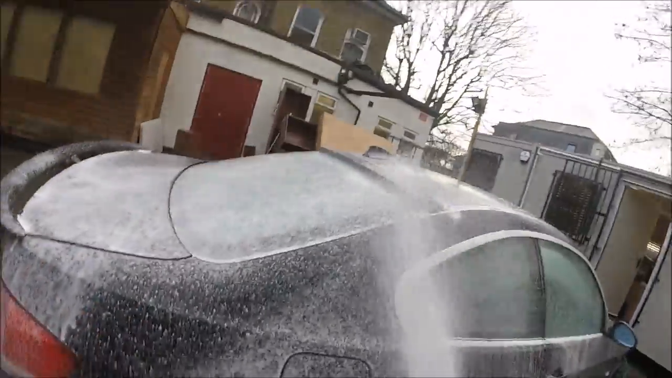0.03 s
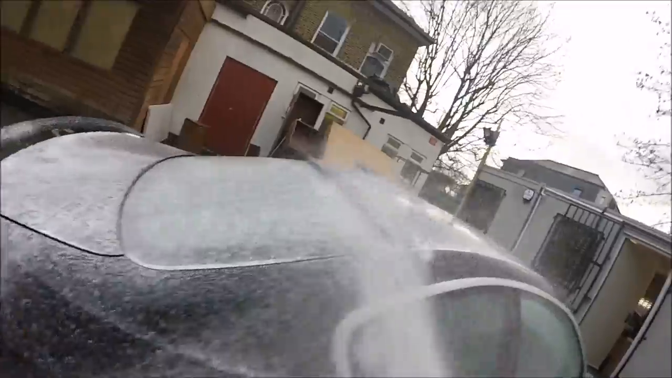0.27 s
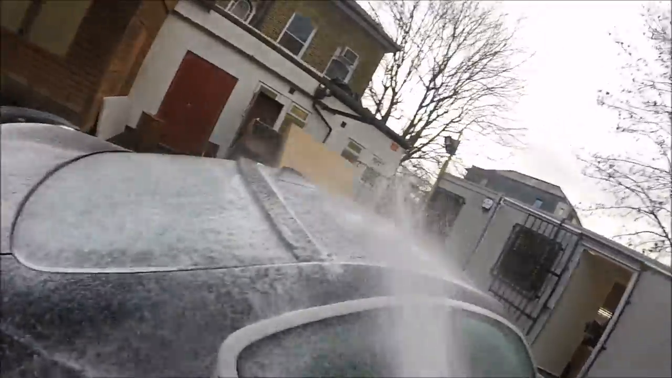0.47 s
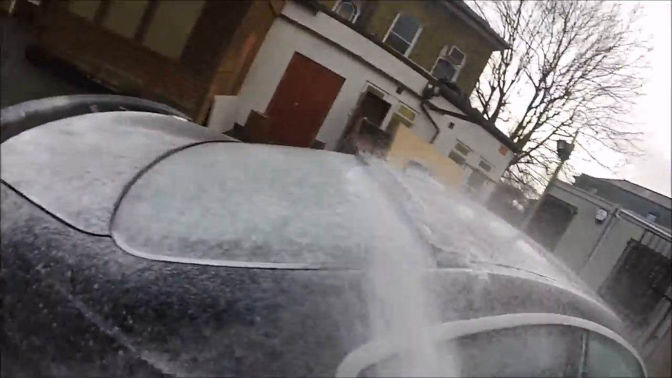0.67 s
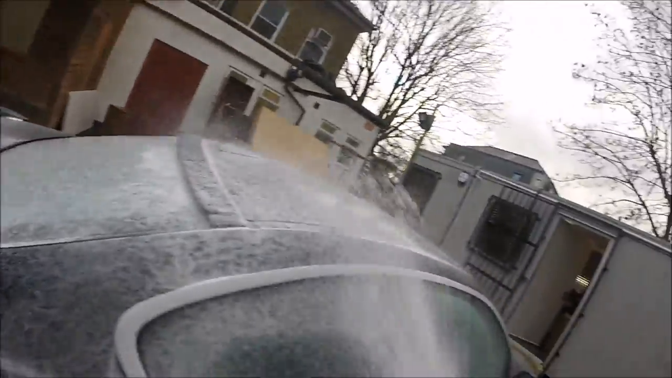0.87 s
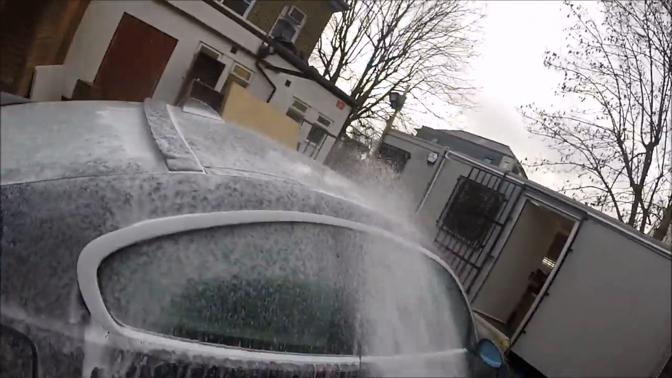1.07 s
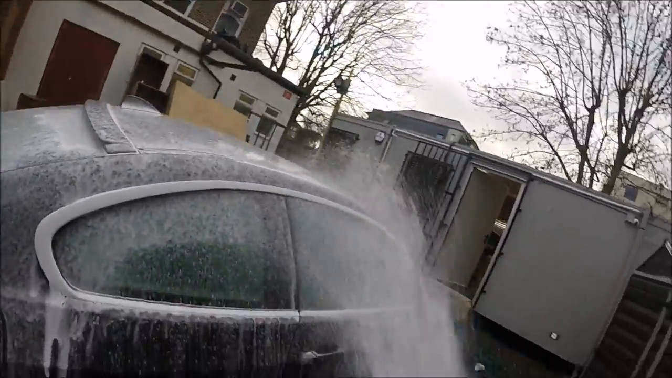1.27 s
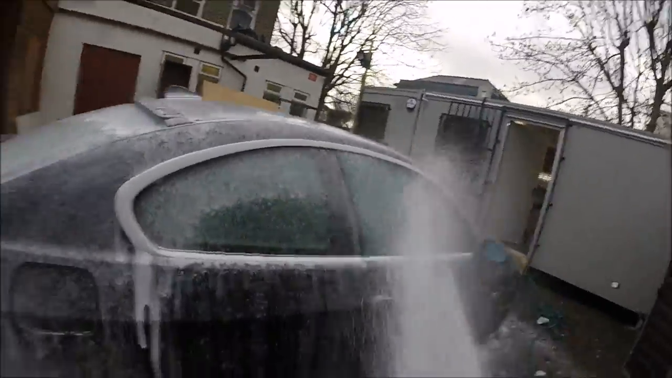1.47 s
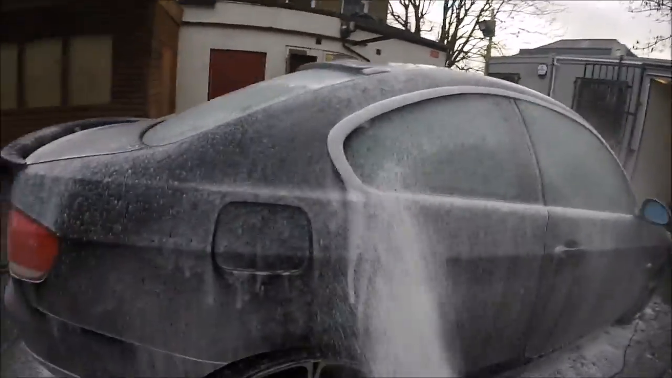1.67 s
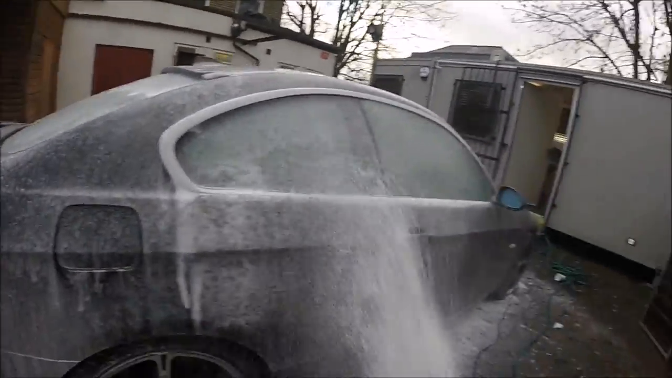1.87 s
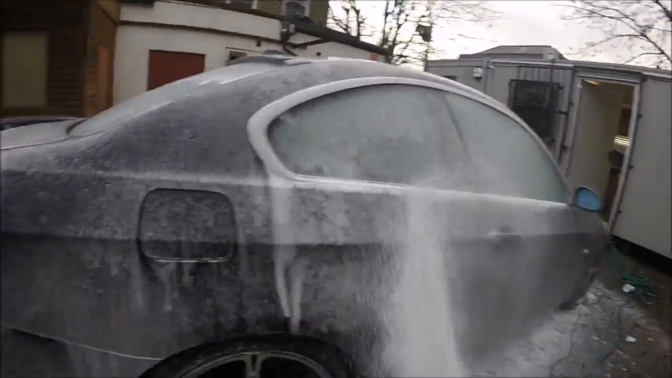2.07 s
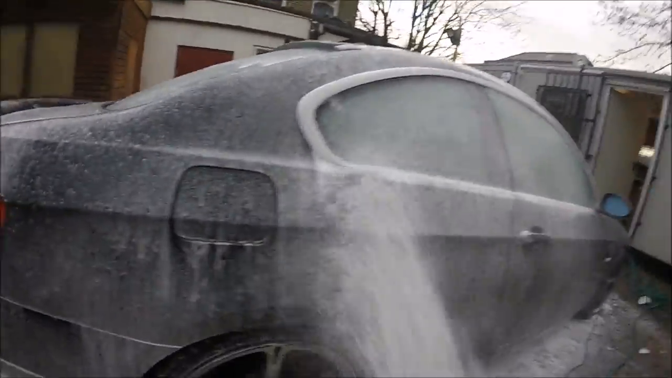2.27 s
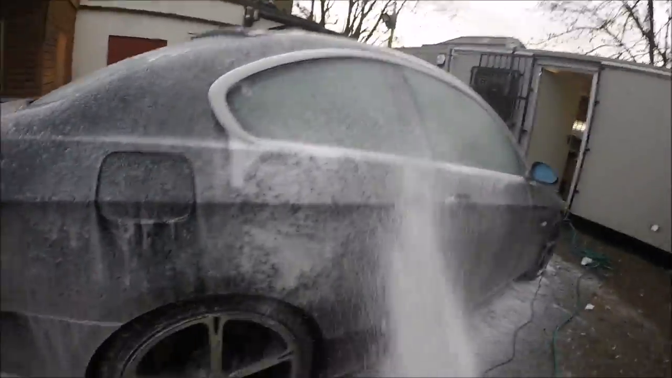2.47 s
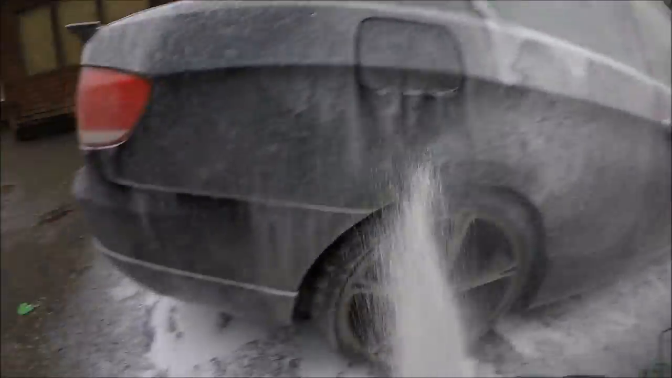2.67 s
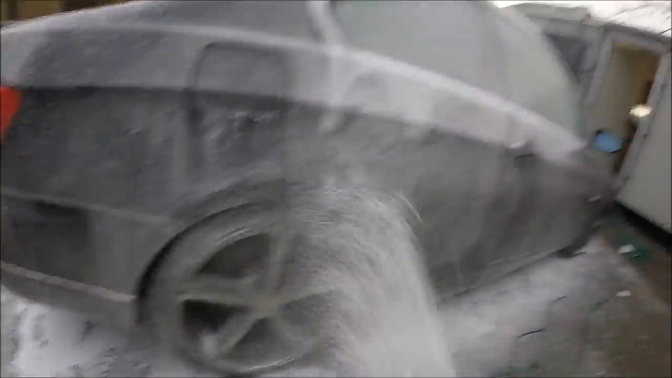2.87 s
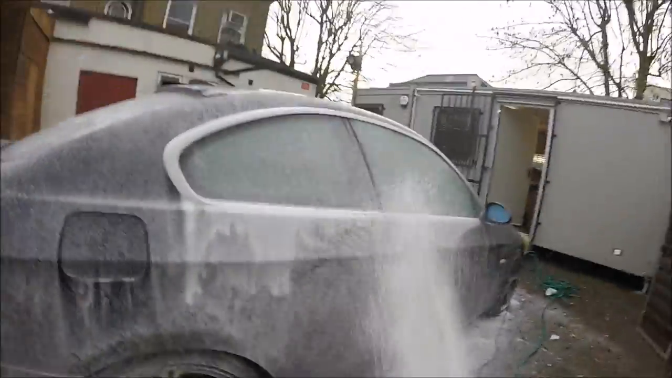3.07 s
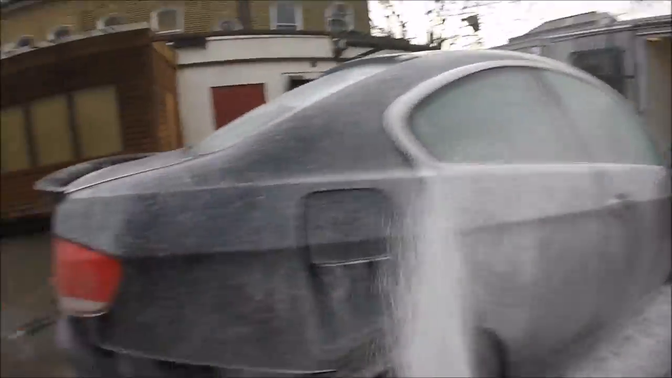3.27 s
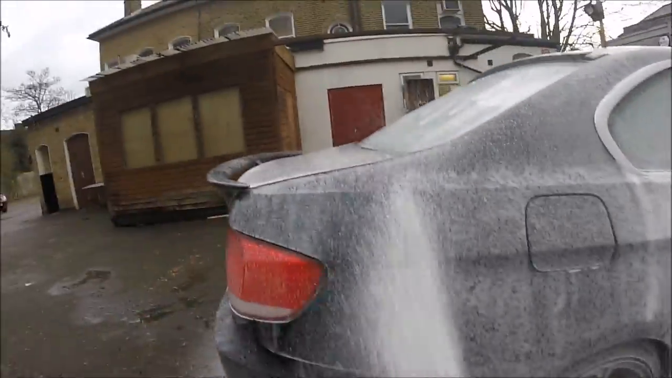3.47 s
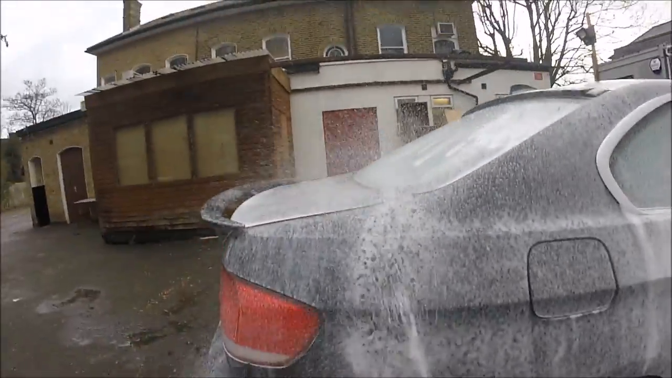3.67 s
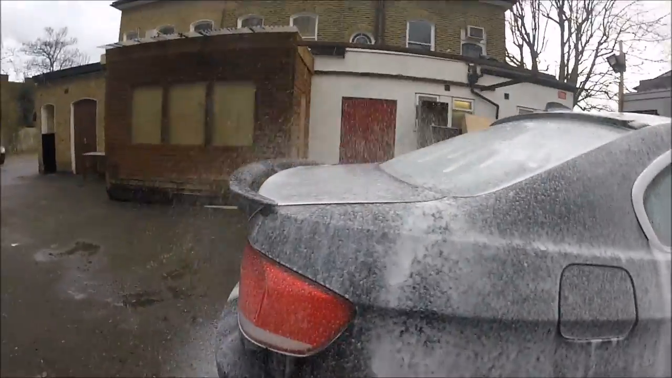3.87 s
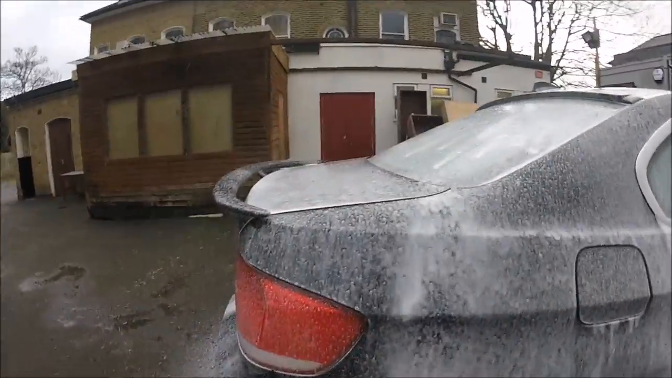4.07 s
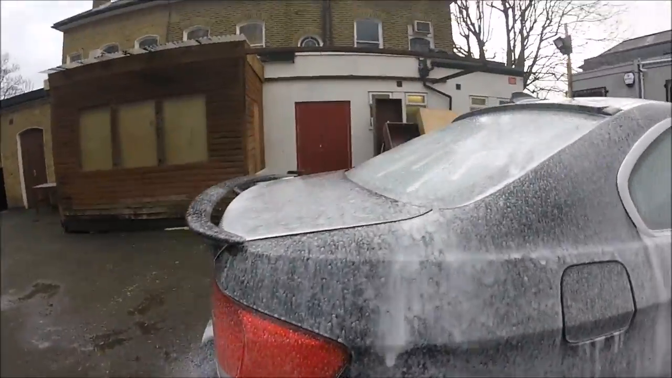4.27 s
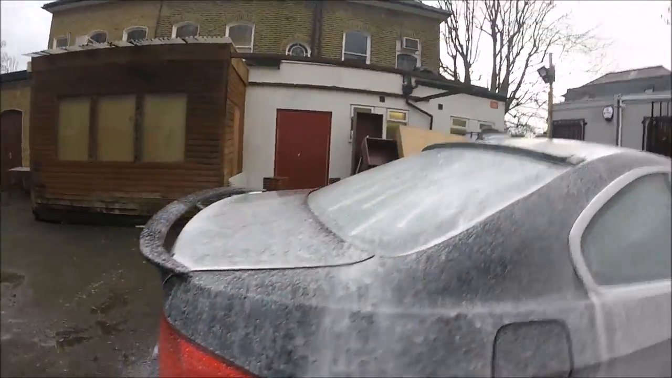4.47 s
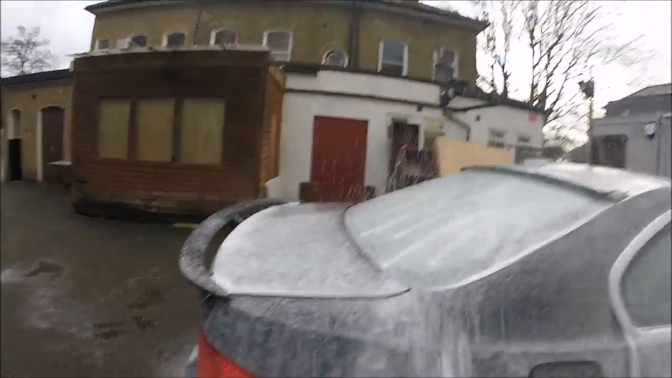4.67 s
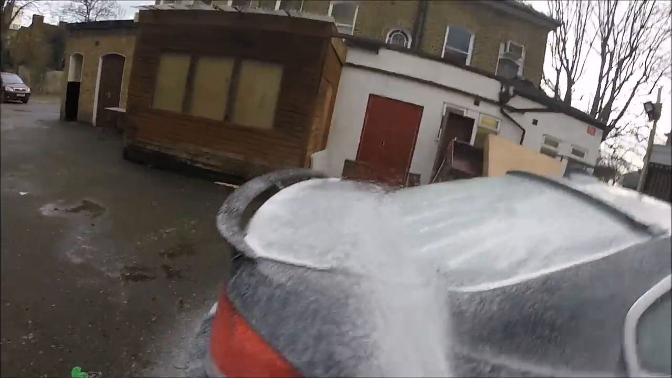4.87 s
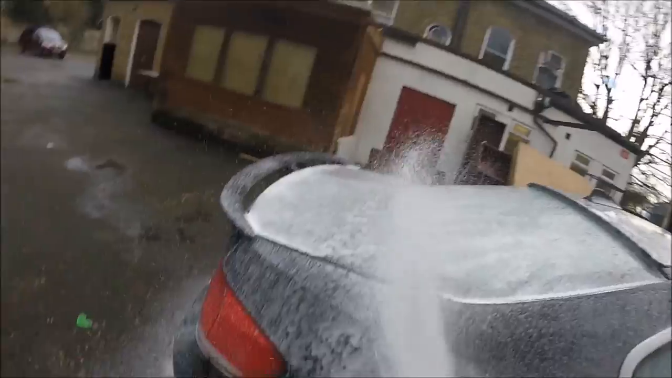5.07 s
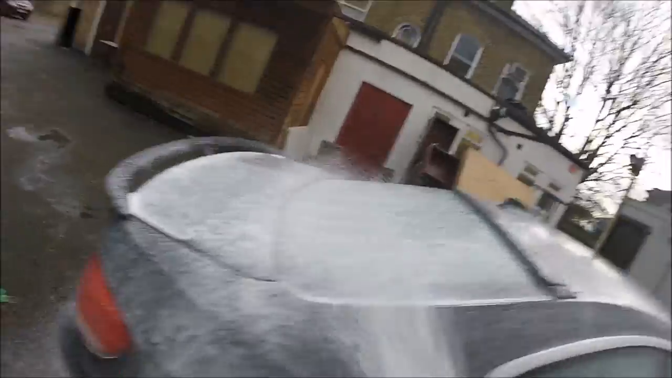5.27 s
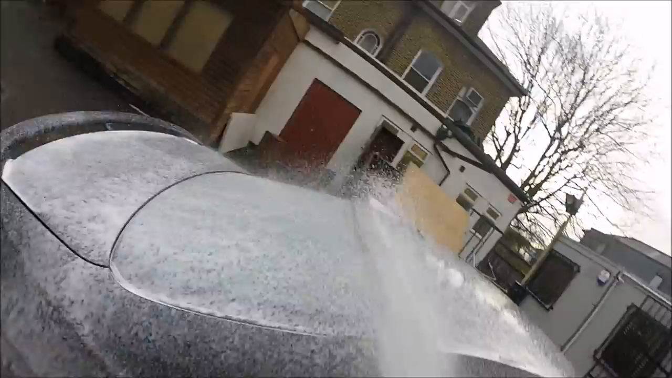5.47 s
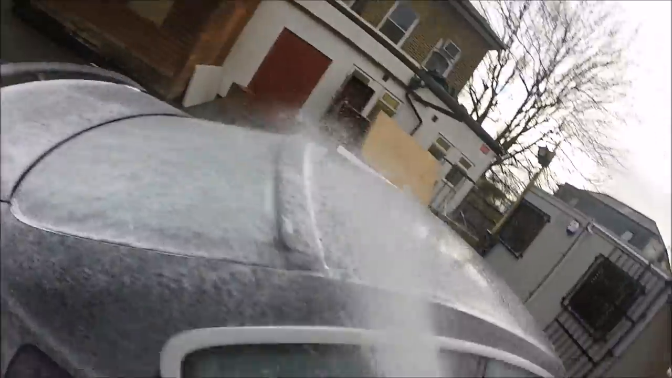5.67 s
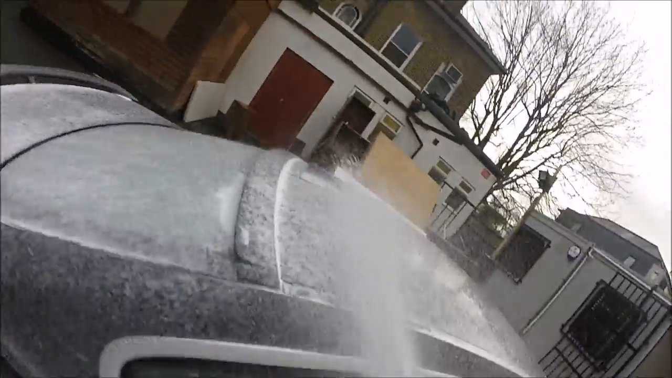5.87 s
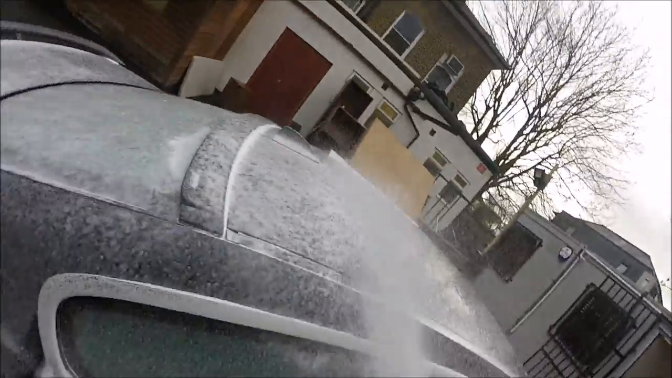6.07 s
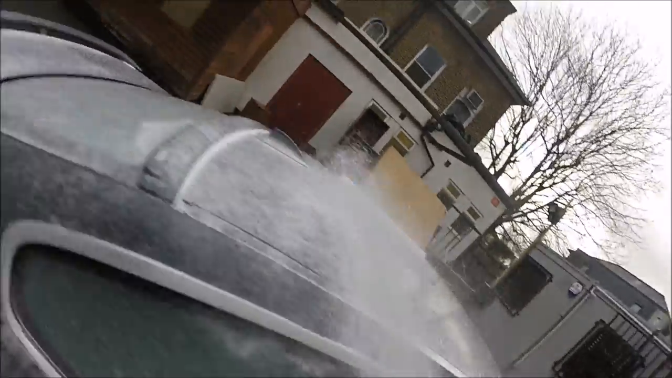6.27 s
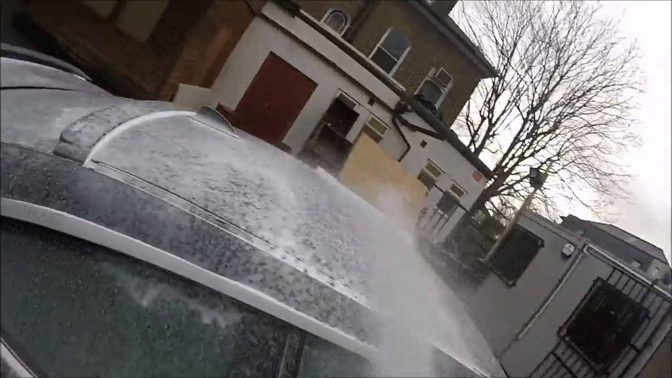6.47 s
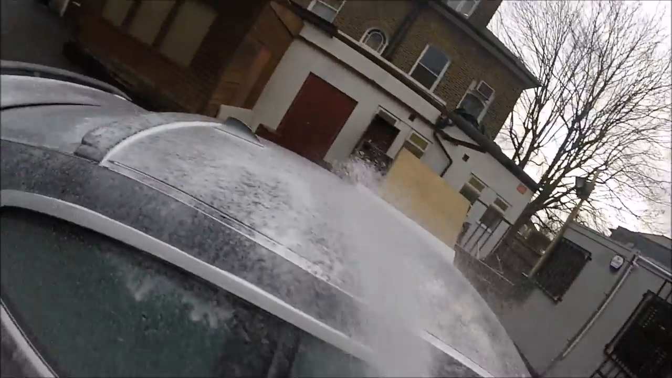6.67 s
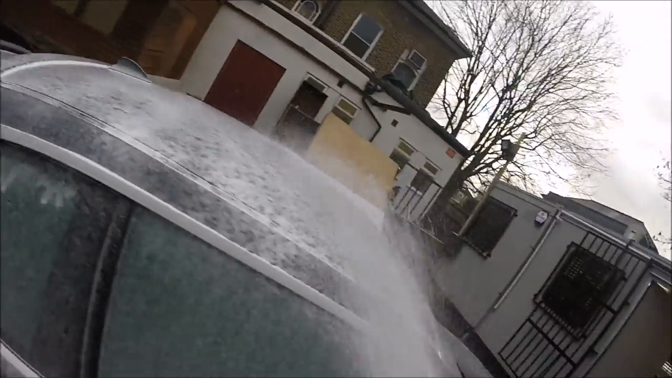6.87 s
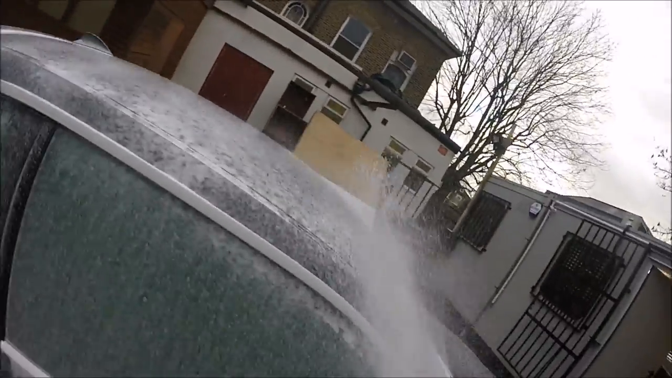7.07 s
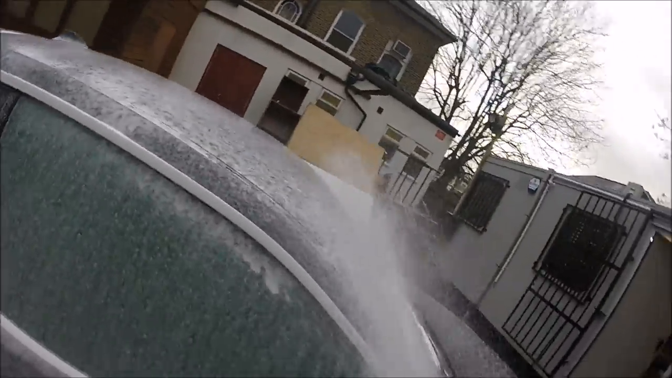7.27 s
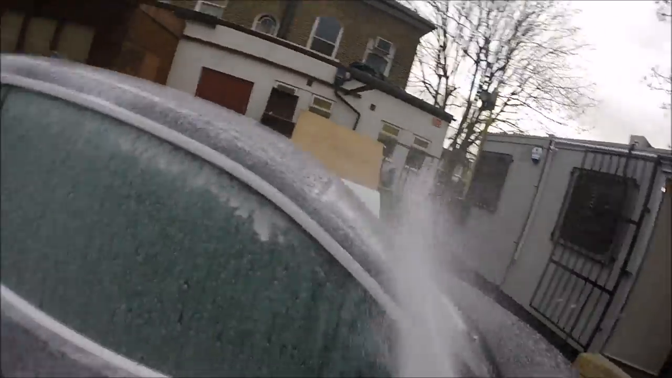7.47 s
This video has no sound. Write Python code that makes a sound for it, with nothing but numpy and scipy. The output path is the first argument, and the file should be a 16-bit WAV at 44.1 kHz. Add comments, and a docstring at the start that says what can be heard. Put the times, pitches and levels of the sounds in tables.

```python
"""A pressure washer sprays foam over a car in a yard, heard by a small camera in a closed housing on the lance.
The jet hisses and sputters; the three-piston pump hums through hose and grip, and the housing rumbles.
At 3.7 s the trigger is let go: the valve snaps shut and hisses briefly, and the pump runs down.
In the quiet, hands shift and the grip knocks a few times, ringing the lance.
At 4.7 s the trigger snaps open: water spits out, the pump runs up and the jet fills again."""
import sys
import numpy as np
from scipy import signal
from scipy.io import wavfile
from scipy.ndimage import uniform_filter1d

SR = 44100
rng = np.random.default_rng(int(sys.argv[2]) if len(sys.argv) > 2 else 0)


def unload_audio(sound):
    """Save the sound as a 16-bit wav file, at the path given as the first command line argument."""
    columns = np.transpose(np.atleast_2d(sound))
    # keep every value between -1 and 1, then stretch to whole-number steps
    steps = np.round(np.clip(columns, -1, 1) * 32767)
    wavfile.write(sys.argv[1], SR, steps.astype(np.int16))


N = 332073
RELEASE_S, PULL_S = 3.736, 4.711  # trigger


def amp(db):
    """Gain of a level in dB."""
    return 10 ** (np.asarray(db) / 20)


def unit_rms(x):
    """Scales to rms 1."""
    return x / np.sqrt(np.mean(x ** 2) + 1e-20)


def spectrum_db(table, hz):
    """Interpolates a spectrum table on a log-frequency axis."""
    table_hz, db = np.transpose(table)
    return np.interp(np.log(hz + 1), np.log(table_hz + 1), db)


def curves(spans, t):
    """Columns of consecutive time tables, interpolated at t."""
    time_s, *columns = np.concatenate(spans).T
    return [np.interp(t, time_s, column) for column in columns]


def wander(span_s):
    """Random drift of rms 1, smoothed over span_s."""
    size = max(round(span_s * SR), 1)
    return unit_rms(uniform_filter1d(uniform_filter1d(rng.standard_normal(N), size), size))


def colour(x, db_at):
    """Minimum-phase filter with gain db_at(hz)."""
    log_gain = np.log(amp(db_at(abs(np.fft.fftfreq(8192, 1 / SR)))))
    taps = np.fft.ifft(np.exp(log_gain - 1j * signal.hilbert(log_gain).imag)).real[:4096]
    return signal.oaconvolve(x, taps * np.hanning(8192)[4096:])[:N]


def noise(spectrum):
    """Coloured noise of rms 1."""
    return unit_rms(colour(rng.standard_normal(N), lambda hz: spectrum_db(spectrum, hz)))


def bursts(events, t):
    """One decaying puff of noise per row: start_s, level_db, decay_s."""
    envelope = np.zeros(N)
    for start_s, level_db, decay_s in events:
        age_s = np.maximum(t - start_s, 0)
        envelope += amp(level_db) * (1 - np.exp(-age_s / .00093)) * np.exp(-age_s / decay_s)
    return envelope * rng.standard_normal(N)


def running(t, stop_s, restart_s):
    """Gate: 0 from stop to restart, 1 outside, 24 ms ramps."""
    return np.clip(np.maximum(stop_s - t, t - restart_s) / .024, 0, 1)


# Jet spectrum at the microphone: freq_hz, gain_db
HOUSING_SLOPE = [(60, -23.5), (150, -15.5), (310, -13), (440, -26), (620, -16), (800, -8.5), (1300, -6),
                 (2900, -1), (3800, -20.5), (6100, -31), (9200, -42.5), (10000, -51.5), (13400, -49.5),
                 (14300, -55.5)]
# Housing resonances and dips: centre_hz, width_hz, gain_db
CAVITIES = [(756, 163, 8.5), (1797, 49, 5), (1822, 36, -8.5), (2200, 192, 4.5), (2640, 72, -1.5),
            (2950, 88, 0.5), (3101, 152, -10), (3284, 90, 5.5), (4020, 260, 4), (5555, 1150, 15),
            (6016, 480, -7.5), (6820, 170, 6), (8100, 500, -0.5), (11600, 500, -1.5)]


def housing_db(hz):
    """Response of the closed housing: a broad slope with peaks and dips."""
    peaks_db = sum(db / (1 + (2 * (hz - centre_hz) / width_hz) ** 2) for centre_hz, width_hz, db in CAVITIES)
    return spectrum_db(HOUSING_SLOPE, hz) + peaks_db


# Outdoor air: freq_hz, relative_db
YARD_SPECTRUM = [(100, -12), (300, -26), (1000, -35), (3000, -35), (7000, -39), (12000, -50)]
# Background hiss, dips after the jet stops, creeps up as the camera's gain recovers: time_s, level_db
BACKGROUND_LEVEL = [(4.0, -62), (4.1, -71), (4.18, -70), (4.3, -60), (4.7, -62)]


def yard(t):
    """Faint outdoor hiss, masked except in the pause."""
    return amp(curves([BACKGROUND_LEVEL], t)[0]) * noise(YARD_SPECTRUM)


# Housing shake: time_s, level_db
RUMBLE_LEVEL = [(0, -43), (1.3, -50), (2.3, -42), (3.6, -41), (3.8, -38), (4.3, -44.5), (4.7, -33),
                (5.8, -50), (7.53, -46)]
# Shake spectrum: freq_hz, relative_db
RUMBLE_SPECTRUM = [(15, -35.5), (40, 14), (62, 10), (100, 9.5), (200, -4.5), (400, -47.5), (1500, -85)]


def rumble(t):
    """Hand and hose shake the housing in low lumps."""
    return amp(curves([RUMBLE_LEVEL], t)[0] + 5.2 * wander(.065)) * noise(RUMBLE_SPECTRUM)


def rough_hiss(spectrum):
    """Uneven hiss through the housing, rms 1."""
    rough = rng.standard_normal(N) * amp(3.2 * wander(.0023))
    return unit_rms(colour(rough, lambda hz: housing_db(hz) + spectrum_db(spectrum, hz)))


# Hand shifts: peak_s, level_db, rise_s, hold_s, fall_db_per_s
RUBS = [(4.05, -58, 0.096, .04, 200), (4.19, -44, .005, .048, 900), (4.35, -53, .05, .02, 202),
        (4.5, -52, .06, .02, 59), (4.69, -44, .06, .02, 300)]
# Rub spectrum before the housing: freq_hz, relative_db
RUB_SPECTRUM = [(150, 18.5), (450, 23), (900, 1), (1600, -4.5), (2400, -9.5), (12000, -30)]


def hands(t):
    """Hands shift on the grip with a dull hiss."""
    envelope = np.zeros(N)
    for peak_s, level_db, rise_s, hold_s, fall_db_per_s in RUBS:
        rise = np.clip(1 + (t - peak_s) / rise_s, 0, 1) ** 2
        envelope += rise * amp(level_db - fall_db_per_s * np.maximum(t - peak_s - hold_s, 0))
    return envelope * rough_hiss(RUB_SPECTRUM)


# Valve hiss before the housing: freq_hz, relative_db
BLEED_SPECTRUM = [(150, 12), (450, 20), (800, 6), (1600, 1), (2350, 7), (2900, -12), (4300, 4.5),
                  (5500, -11), (7000, 0), (12000, -5)]


def valve_bleed(t, peak_s=3.866, peak_db=-31.5, end_s=4.05):
    """The valve's hiss swells and fades after the release."""
    level_db = peak_db - 10 * ((t - peak_s) / .12) ** 2
    gate = (t > RELEASE_S) * np.clip((end_s - t) / .017, 0, 1)
    return amp(level_db) * gate * rough_hiss(BLEED_SPECTRUM)


# Bumps on the housing: start_s, level_db, pitch_hz
THUMPS = [(0.431, -21, 50), (1.52, -25, 50), (3.747, -9, 68), (3.788, -18, 90), (4.069, -15, 85),
          (4.108, -19, 90), (4.139, -18, 70), (4.187, -9, 55), (4.357, -18.5, 80), (4.518, -10.5, 65),
          (4.638, -19, 70), (4.669, -16, 80), (4.71, -9.5, 59), (4.807, -24, 75), (5.31, -22, 60),
          (6.05, -20, 60), (6.12, -19, 55.4), (6.8, -25, 55.8)]


def thumps(t):
    """The bumped housing swings and dies away; slower swings last longer."""
    out, age_s = np.zeros(N + SR), t[:SR // 2]
    attack = 1 - np.exp(-age_s / .0023)
    for start_s, level_db, pitch_hz in THUMPS:
        t60_s = .11 * (70 / pitch_hz) ** 2
        phase = 2 * np.pi * pitch_hz * (age_s + .004 * (1 - np.exp(-age_s / .004)))  # starts sharp
        out[round(start_s * SR):][:len(age_s)] -= amp(level_db - 60 * age_s / t60_s) * np.sin(phase) * attack
    return out[:N]


# Grip knocks: start_s, level_db, decay_s
KNOCKS = [(3.743, -17, 0.0024), (3.793, -34, 0.0039), (4.137, -51, 0.0034), (4.187, -25, 0.003),
          (4.198, -23, 0.004), (4.218, -34, .01), (4.495, -38.5, .004), (4.517, -18, 0.0037),
          (4.67, -31, 0.0057), (4.691, -43, 0.0038), (4.72, -13, 0.008)]
# Click spectrum before the housing: freq_hz, relative_db
CLICK_SPECTRUM = [(100, 31), (400, 19.5), (900, 11), (1700, 5.5), (2450, -7), (3500, -6), (7000, -19)]
# Lance modes: pitch_hz, relative_db, t60_s
LANCE_MODES = [(1820, -27, 0.19), (2410, 4, 0.02), (588, 4, 0.026), (990, -3, 0.03), (292, 3.5, 0.027)]


def knocks(t):
    """Dull knocks on the grip pass through the housing and ring the lance."""
    clicks = colour(bursts(KNOCKS, t), lambda hz: housing_db(hz) + spectrum_db(CLICK_SPECTRUM, hz) + 4.5)
    strikes, age_s = np.zeros(N), t[:SR // 2]
    for start_s, level_db, _ in KNOCKS:
        strikes[round(start_s * SR)] = amp(level_db)
    ring = sum(amp(db - 60 * age_s / t60_s) * np.sin(2 * np.pi * hz * age_s) for hz, db, t60_s in LANCE_MODES)
    ring *= 1 - np.exp(-age_s / .0028)
    return clicks + signal.oaconvolve(strikes, ring)[:N]


# Trigger valve shutting, opening: start_s, level_db, decay_s
SNAPS = [(3.7408, 13.5, .0012), (4.715, 9, .005)]


def valve_snaps(t):
    """The trigger valve snaps, heard through the housing."""
    return colour(bursts(SNAPS, t), housing_db)


# First slug of water: start_s, level_db, decay_s
SPIT = (4.7205, -18, 0.0053)


def spit(t):
    """A bright crack as water first bursts from the nozzle."""
    spectrum = [(1500, -30), (5500, 6), (9000, -1), (14000, -10)]
    return colour(bursts([SPIT], t), lambda hz: spectrum_db(spectrum, hz))


# Loaded pump, before and after the pause: time_s, stroke_hz, stroke_db, octave_db
PUMP_LOADED = [
    [(0, 250.4, -26, -38), (.65, 250, -21.5, -49.5), (.81, 250.1, -25.5, -40), (1.06, 249, -22.5, -50),
     (1.4, 249, -23, -43), (1.55, 249.1, -22.5, -52), (1.95, 248.3, -26, -42.5), (2.3, 248, -26, -54),
     (2.74, 248.1, -31, -48), (2.93, 249, -32, -36.5), (3.2, 250, -28, -50), (3.72, 249.1, -31.5, -45)],
    [(5.1, 249, -27, -43), (5.2, 249.2, -27, -55), (5.55, 252.7, -22.5, -47), (5.76, 252.5, -26.5, -54),
     (5.95, 253.2, -22, -36), (6.1, 252.9, -24, -47.5), (7.2, 252.5, -25, -51), (7.45, 252.7, -24, -41.5)],
]
# Stroke tone through hose and grip, running down: pitch_hz, level_db
RUN_DOWN_STROKE = [(58, -32), (70, -20), (90, -32), (135, -23.5), (178, -18.5), (215, -25), (250, -27)]
# Its overtones, running down: pitch_hz, level_db
RUN_DOWN_OVERTONES = [(130, -39), (200, -49), (270, -38), (350, -41), (420, -56), (750, -62)]
# Harmonics, running up: stroke_db, octave_db, twelfth_db
RUN_UP_DB = [-29, -43, -50]
# Hose flutter at half the stroke rate: start_s, end_s, level_db
FLUTTER = [(.5, 0.745, -32.5), (1.02, 1.301, -35), (1.453, 1.7, -32), (1.781, 1.95, -34), (2.0, 2.15, -32)]
# Shaft tones under load: shaft_order, level_db
SHAFT_TONES = [(1, -39), (2, -39.5), (9, -34)]
PISTONS, MAINS_HZ, MAINS_DB = 3, 100, -46
MOTOR_OFF_S, RUN_DOWN_TAU_S = 3.783, .235
MOTOR_ON_S, RUN_UP_TAU_S = 4.745, .09


def pump(t):
    """Piston strokes hum, gliding with motor speed; load adds wavering shaft tones and mains hum."""
    loaded_hz, stroke_db, octave_db = curves(PUMP_LOADED, t)
    restarted = t > MOTOR_ON_S
    run_down = np.exp(np.minimum(MOTOR_OFF_S - t, 0) / RUN_DOWN_TAU_S)
    run_up = 1 - np.exp((MOTOR_ON_S - t) / RUN_UP_TAU_S)
    speed = np.where(restarted, run_up, run_down)
    stroke_hz = loaded_hz * speed
    glide_db = []
    for harmonic, up_db in enumerate(RUN_UP_DB, 1):
        down_db = spectrum_db(RUN_DOWN_OVERTONES if harmonic > 1 else RUN_DOWN_STROKE, harmonic * stroke_hz)
        glide_db.append(np.where(restarted, up_db, down_db))
    steady = np.clip((speed - .95) / .037, 0, 1)
    stroke_db = steady * stroke_db + (1 - steady) * glide_db[0]
    octave_db = steady * octave_db + (1 - steady) * glide_db[1]
    load = np.clip((stroke_hz - 222) / 24, 0, 1) * running(t, RELEASE_S, PULL_S)
    phase = 2 * np.pi * np.cumsum(stroke_hz * (1 + .003 * wander(.033))) / SR
    tone = amp(stroke_db + .77 * wander(.051)) * np.sin(phase)
    tone += amp(octave_db + 3.1 * wander(.049)) * np.sin(2 * phase + .6 * wander(.012))
    tone += amp(glide_db[2]) * (1 - load) * np.sin(3 * phase)
    for start_s, end_s, level_db in FLUTTER:
        fade = np.clip(np.minimum(t - start_s, end_s - t) / .065, 0, 1)
        tone += amp(level_db) * fade * np.sin(phase / 2)
    for order, level_db in SHAFT_TONES:
        waver_db, drift_rad = 3.06 * wander(.17), .8 * wander(.023)
        tone += load * amp(level_db + waver_db) * np.sin(order * phase / PISTONS + drift_rad)
    tone += load * amp(MAINS_DB + 2.7 * wander(.093)) * np.sin(2 * np.pi * MAINS_HZ * t)
    return np.sqrt(2) * tone * running(t, stop_s=4.12, restart_s=4.785)


def flow(t, dribble_db=-18, fall_db_per_s=390, gush_db=-1, build_from_s=4.759, build_tau_s=.18):
    """Jet gain: full, a dying dribble, a gush of stored pressure, then a rise as the pump builds up."""
    dribble = amp(dribble_db - fall_db_per_s * np.maximum(t - RELEASE_S, 0))
    age_s = np.maximum(t - PULL_S, 0)
    gush = amp(gush_db) * (1 - np.exp(-age_s / .005)) * np.exp(-age_s / .027)
    build = 1 - np.exp(-np.maximum(t - build_from_s, 0) / build_tau_s)
    return np.where(t < RELEASE_S, 1, dribble + gush + build)


# Jet at full flow as the lance sweeps, before and after the pause: time_s, level_db
JET_LEVEL = [
    [(0, -16), (.4, -14), (.86, -14.5), (1.1, -17), (1.6, -15), (1.85, -16), (2.6, -14.5), (2.85, -16.5),
     (3.17, -14), (3.43, -16.5), (3.6, -15.5), (3.72, -17)],
    [(5.25, -16), (5.67, -17.5), (5.9, -16.5), (6.15, -15.5), (6.4, -16), (6.7, -16), (6.92, -13.5),
     (7.2, -15.5), (7.53, -15.5)],
]
# Brief splashes: centre_s, treble_db, half_length_s
SPLASHES = [(.02, 2.5, .1), (1.15, 1.5, .1), (3.09, 5, .05), (3.45, 3.5, .08), (4.73, 11, .03),
            (4.84, 10, .07), (5.9, -1, .1), (6.1, 1.5, .05), (7.09, 1, .04)]
# Hollow in the hiss, moving as the lance swings: time_s, centre_hz, gain_db
HOLLOW = [(0, 4620, -2.5), (2.7, 4610, -4.5), (3.0, 4950, -5.5), (5.45, 4690, -3.5), (5.7, 4260, -9.5),
          (6.7, 4280, -8.5), (6.85, 4800, -6)]


def jet(t, treble_from_hz=4200, hollow_width_hz=260):
    """Foam tears out of the nozzle: patchy noise that sputters in short slugs, with bright splashes."""
    slugs_db = .83 * wander(.0013) + .66 * wander(.012) + .3 * wander(.081)
    hz, frame_s, bands = signal.stft(rng.standard_normal(N) * amp(slugs_db), SR, nperseg=512)
    patches = uniform_filter1d(rng.standard_normal(bands.shape), size=6, axis=0)
    patches_db = .8 * unit_rms(uniform_filter1d(patches, size=10, axis=1))
    splash_db = sum(db * np.exp(-((frame_s - centre_s) / half_s) ** 2) for centre_s, db, half_s in SPLASHES)
    treble = np.clip(np.log2((hz + 1) / treble_from_hz) / .82, 0, 1)
    dip_hz, dip_db = curves([HOLLOW], frame_s)
    hollow_db = dip_db / (1 + (2 * (hz[:, None] - dip_hz) / hollow_width_hz) ** 2)
    bands *= amp(patches_db + treble[:, None] * splash_db + hollow_db)
    spray = signal.istft(bands, SR, nperseg=512)[1][:N]
    return unit_rms(colour(spray, housing_db)) * amp(curves(JET_LEVEL, t)[0]) * flow(t)


def scene():
    """All sources at one microphone."""
    t = np.arange(N) / SR
    water = jet(t) + spit(t) + valve_snaps(t) + valve_bleed(t)
    return (water + hands(t) + pump(t) + rumble(t) + thumps(t) + knocks(t) + yard(t))[None]


def record(dry, cutoff_hz=15200):
    """Soft ceiling, then low-pass."""
    lowpass = signal.firwin(511, cutoff_hz, window=("kaiser", 9), fs=SR)
    return signal.oaconvolve(1.5 * np.tanh(dry / 1.53), lowpass[None], "same")


dry = scene()
out = record(dry)
unload_audio(out)
```